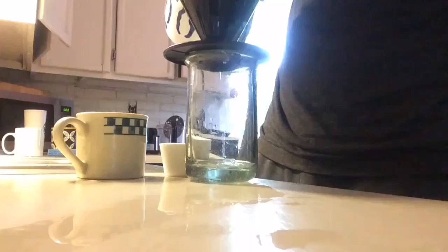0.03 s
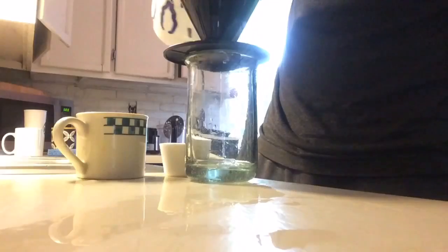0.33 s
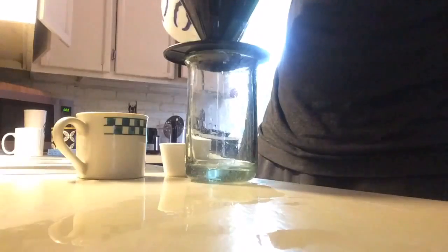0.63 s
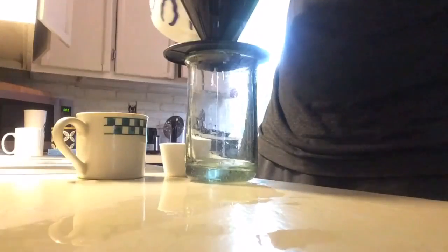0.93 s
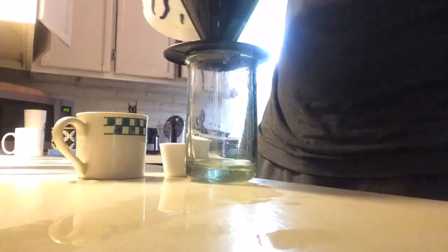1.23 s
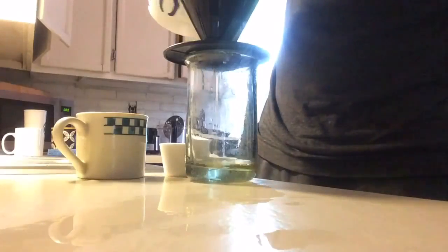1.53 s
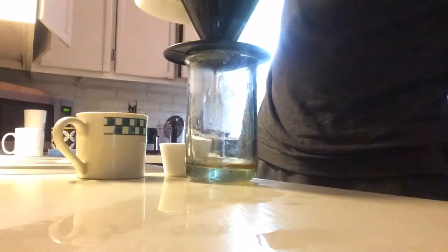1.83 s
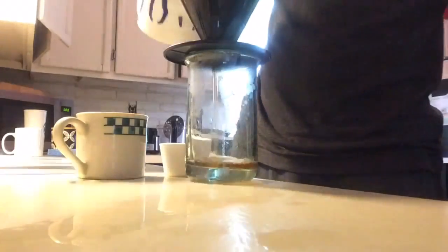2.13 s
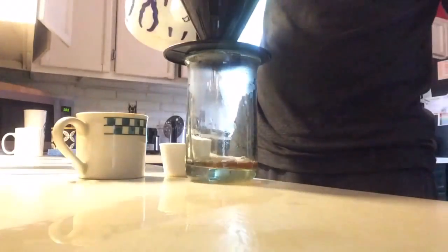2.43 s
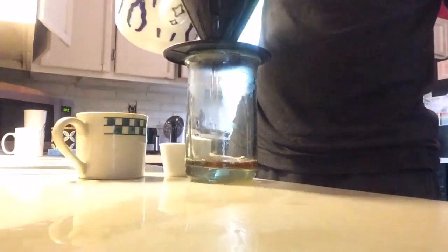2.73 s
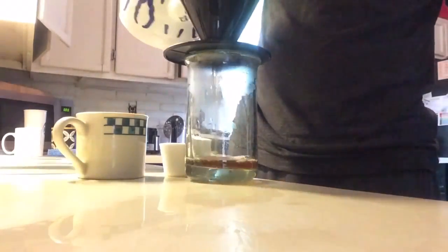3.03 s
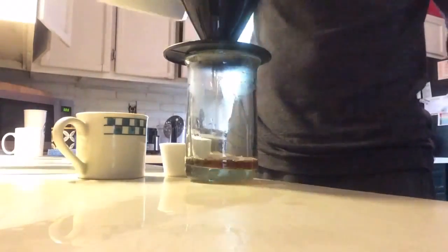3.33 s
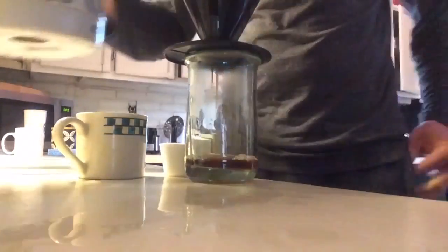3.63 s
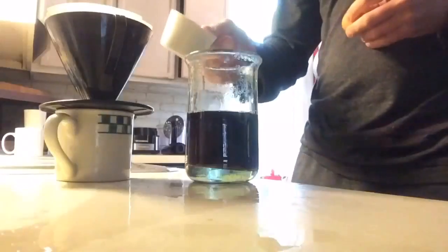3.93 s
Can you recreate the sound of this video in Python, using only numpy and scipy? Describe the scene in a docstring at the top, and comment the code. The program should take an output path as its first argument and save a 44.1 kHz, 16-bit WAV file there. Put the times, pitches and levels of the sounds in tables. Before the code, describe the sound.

A close, gentle pour of water bubbles and splats on wet coffee grounds, joined halfway by quick drops plinking into a glass jar. A dull kettle bump comes near the end, over a kitchen's steady fan and refrigerator hum.

```python
"""A refrigerator hums and a fan rushes in a small kitchen as water pours from a kettle into a coffee
dripper. Bubbles gurgle and burst in the dripper's cone, and the stream spatters on the wet grounds.
Then coffee drips into the glass jar below: each drop slaps the surface and rings the air in the glass,
and a few tiny bubbles chirp. Last, the kettle is lifted away with two soft bumps and a faint ring."""
import sys
import numpy as np
from scipy import signal
from scipy.fft import rfft, irfft, next_fast_len
from scipy.io import wavfile
from scipy.ndimage import map_coordinates

SR = 44100
rng = np.random.default_rng(int(sys.argv[2]) if len(sys.argv) > 2 else 0)


def transcribe(signal):
    """Save signal, clipped to [-1, 1], as a 16-bit WAV file at the path in sys.argv[1]."""
    frames = np.atleast_2d(signal).T
    limited = np.clip(frames, -1, 1)
    pcm = np.round(limited * 32767).astype(np.int16)
    wavfile.write(sys.argv[1], SR, pcm)


N = 176400

# A t60 is the time a sound takes to fade by 60 dB. Relative levels get a further gain later.
HUM_TONES = [(117.8, -51), (119.8, -69.5), (203.6, -69.5), (212.8, -64.5), (239.6, -55.5), (407.4, -70),
             (459.4, -62.5), (471.0, -66), (706.4, -69), (814.6, -65)]  # motor and mains tones (f/Hz, rms level/dB)
FAN_COLOUR = [(25, -15), (60, -10.5), (100, -2), (150, 1), (240, -5.5), (310, 0), (440, -4), (530, -9.5),
              (650, -6.5), (950, -6), (1200, -6.5), (1600, -15), (2300, -17.5), (3000, -21), (4000, -29),
              (5000, -31), (7000, -35), (11000, -40.5), (15800, -37)]  # the fan's rush from bass to treble (f/Hz, relative level/dB)
FAN_RESONANCES = [(728, 60, -59), (803.3, 31, -59.5), (863.2, 34, -56), (1042, 9, -70)]  # pitches that stand out of the rush (f/Hz, width/Hz, rms level/dB)
WHINE_LEVELS = [(.1, -79.5), (1.7, -80.5), (2.4, -85)]  # a faint high whine (t/s, level/dB)
CONE_RESONANCES = [(1720, 300, -6), (2023, 190, 0), (2278, 62, 3), (2610, 270, -3.5)]  # air ringing in the dripper (f/Hz, width/Hz, relative level/dB)
GURGLE_LEVELS = [(.1, -67), (.3, -66), (.4, -60.5), (.65, -67), (.75, -56.5), (.85, -59.5), (.98, -54.5),
                 (1.08, -65), (1.2, -56.5), (1.45, -54.5), (1.72, -56), (1.76, -66), (2.85, -66),
                 (2.93, -62), (3.1, -58), (3.16, -62), (3.7, -64), (3.76, -63)]  # the stream churning the grounds (t/s, relative level/dB)
SPATTER_LEVELS = [(.1, -74), (.48, -74), (.61, -67.5), (.72, -70.5), (1.08, -71), (1.18, -68.5),
                  (1.28, -71.5), (1.45, -72), (1.64, -66), (1.77, -72.5), (2.36, -75), (2.85, -69),
                  (3.03, -68), (3.09, -63), (3.18, -71.5), (3.36, -71.5), (3.7, -68), (3.75, -89)]  # spatter on the wet grounds (t/s, relative level/dB)
FILTER_SPLATS = [(0.4918, -53), (0.5524, -51), (0.612, -49), (0.9227, -50.5), (1.141, -51), (1.1737, -53),
                 (1.184, -48), (1.362, -49), (1.456, -51), (1.492, -44), (1.515, -48), (1.613, -48),
                 (1.6265, -49), (1.634, -47), (1.645, -45), (1.6888, -48), (2.0562, -54), (2.498, -48),
                 (3.07, -47), (3.093, -43), (3.102, -41.5)]  # single splats on the filter (t/s, relative level/dB)
SPLAT_SPECTRUM = [(1000, -12), (2500, 5.5), (5000, 1), (15800, -5.5)]  # tone colour of a splat (f/Hz, relative level/dB)
BURSTING_BUBBLES = [(0.5172, -38.5, 1850), (0.5287, -43, 2410), (0.734, -41.5, 2130), (0.756, -43, 1980),
                    (0.9582, -38, 2040), (0.9901, -35.5, 1880), (1.6327, -38.5, 2030), (1.72, -36, 2030),
                    (2.2148, -31.5, 2440), (2.747, -45, 2640), (2.9103, -42, 2300), (2.9303, -35, 1880),
                    (2.932, -41.5, 2570), (3.0154, -38.5, 2480), (3.031, -42, 2500), (3.698, -43, 2210)]  # larger bubbles (t/s, relative level/dB, f/Hz)
SPRAY_BURSTS = [(0.548, 0.564, -65), (1.55, 1.695, -72), (3.066, 3.108, -65), (3.393, 3.72, -67)]  # moments when the stream breaks up (start t/s, end t/s, level/dB)
SPRAY_SPECTRUM = [(2000, -35), (5000, -26), (8000, 1), (11500, -7), (14300, 4), (15800, -1)]  # tone colour of that hiss (f/Hz, relative level/dB)
# drops landing in the jar (t/s, then relative level/dB in the low, middle, high and top pitch band)
JAR_DROPS = [(1.827, -83, -56.5, -71, -78), (1.857, -83, -78, -63, -74), (1.927, -82, -82, -66.5, -80),
             (2.028, -85, -67, -84, -90), (2.093, -63.5, -62, -87, -85), (2.105, -76, -57.5, -58.5, -81),
             (2.185, -85, -72, -68.5, -82), (2.316, -62.5, -67, -77, -81), (2.396, -81, -69, -78, -86),
             (2.4128, -82, -65, -71, -62), (2.4279, -62.5, -51, -71, -73), (2.44, -83, -72, -68, -76),
             (2.528, -66, -77, -87, -90), (2.547, -73, -50.5, -66, -78), (2.601, -85, -67, -75, -81),
             (2.62, -77, -52.5, -68, -72), (2.648, -65, -58, -69, -86), (2.6677, -77, -64, -59, -73),
             (2.681, -85, -76, -66, -86), (2.747, -74, -87, -89, -79), (2.8657, -70, -55.5, -67, -77),
             (2.879, -83, -57, -82, -85), (2.898, -55, -58, -62, -75), (2.916, -68, -59, -55, -76),
             (2.946, -77, -56.5, -62, -73), (2.955, -80, -61, -71, -85), (2.977, -83, -61, -70, -84),
             (2.991, -79, -55, -57.5, -61), (3.021, -58.5, -65, -81, -84), (3.062, -77, -62, -66, -69),
             (3.075, -63, -63, -66, -69), (3.1, -57, -67, -71, -75), (3.126, -51, -71, -59.5, -78),
             (3.159, -57, -63, -69, -86), (3.2263, -59.5, -49, -60.5, -76), (3.257, -77, -63, -70, -71),
             (3.319, -72, -61.5, -71, -78), (3.385, -69, -65, -74, -76), (3.4116, -46, -62, -74, -77),
             (3.429, -78, -63, -71, -82), (3.4943, -66, -53.5, -64.5, -73), (3.537, -73, -61.5, -76, -82),
             (3.58, -44.5, -65, -64, -71), (3.585, -62, -61.5, -68, -77), (3.631, -59, -79, -80, -82),
             (3.647, -76, -65, -82, -86), (3.659, -65, -66, -81, -85), (3.6777, -71, -60, -61, -66),
             (3.71, -79, -65, -74, -80), (3.718, -59.5, -72, -77, -78)]
JAR_RINGS = [(3388, -0.5, 0.017), (3515, -3, 0.019), (5895, -6.5, 0.037), (6210, -5.5, 0.025),
             (6620, -12, 0.012), (6880, -9.5, 0.023), (8420, 2, 0.026), (9100, 3.5, 0.04),
             (9820, -3, 0.033), (10200, 2, 0.022), (10810, 3.5, 0.027), (12400, 2, 0.015), (13500, 5, .018),
             (14500, 0, .02)]  # the jar's ringing tones (f/Hz, relative level/dB, t60/s)
BAND_BORDERS = [4500, 7700, 11800]  # where the four bands meet (f/Hz)
BAND_GAINS = [0.79, 1.3, 0.56, 0.3]  # weight of each band (gain/dB)
SPLASH_RANGES = [(3000, 4000), (5600, 7100), (8000, 11300), (11900, 15800)]  # splash noise in each band (low f/Hz, high f/Hz)
SPLASH_LEVELS = [-15, -10, -5, 0]  # splash against the rings in each band (level/dB)
CHIRPING_BUBBLES = [(2.574, -50, 8100), (2.638, -49, 8800), (2.81, -52, 8150), (2.843, -50, 8850),
                    (2.894, -43, 9100), (3.124, -45, 8300), (3.126, -37.5, 3460), (3.6768, -36.5, 9900)]  # tiny bubbles in the jar (t/s, level/dB, starting f/Hz)
KETTLE_BUMPS = [(3.562, 645, -39.5), (3.566, 440, -46)]  # bumps as the kettle is lifted (t/s, f/Hz, level/dB)
ROOM_DECAY = [(300, 0.15), (3000, 0.2), (8000, 0.11), (15000, 0.11)]  # how long the kitchen echoes (f/Hz, t60/s)


def amp(db):
    """Turn decibels into a gain."""
    return 10 ** (np.asarray(db) / 20)


def unit(x):
    """Scale to an average strength (rms) of 1."""
    return x / np.sqrt(np.mean(x ** 2) + 1e-20)


def along(points, hz):
    """Read between (f/Hz, value) points on a log frequency axis."""
    f, v = np.transpose(points)
    return np.interp(np.log(hz + 1), np.log(f + 1), v)


def curve(rows):
    """Join (t/s, value) rows into one value per sample."""
    return np.interp(np.arange(N) / SR, *np.transpose(rows))


def wobble(rate):
    """A smooth curve through `rate` random points a second."""
    return map_coordinates(rng.standard_normal(int(N * rate / SR) + 4), [np.arange(N) * rate / SR])


def filtered(x, response):
    """Scale each frequency f in x by response(f)."""
    m = next_fast_len(len(x) + 8192)
    return irfft(rfft(x, m) * response(np.fft.rfftfreq(m, 1 / SR)), m)[:len(x)]


def noise(response, size=N):
    """Filtered noise of rms 1."""
    return unit(filtered(rng.standard_normal(size), response))


def fade(t, t60):
    """Die away by 60 dB every t60 seconds."""
    return np.exp(-np.log(1000) * t / t60)


def attack(t, rise_s):
    """Swell quickly from 0 towards 1."""
    return 1 - np.exp(-t / rise_s)


def add(out, s, sound):
    """Mix a sound in at s seconds."""
    i = max(round(s * SR), 0)
    out[i:i + len(sound)] += sound[:max(len(out) - i, 0)]


def refrigerator(waver_db=1, drift_rad=0.17):
    """The motor and the mains hum in slightly unsteady tones."""
    out, t = np.zeros(N), np.arange(N) / SR
    for hz, db in HUM_TONES:
        peak = np.sqrt(2) * amp(db + waver_db * wobble(5.13))
        out += peak * np.sin(2 * np.pi * (hz * t + rng.random()) + drift_rad * wobble(1.57))
    return out


def narrow_noise(hz, width):
    """Noise gathered around one pitch."""
    return noise(lambda f: 1 / (1 + ((f - hz) / width) ** 2))


def fan(rush_db=-52):
    """Moving air makes a broad rush, with a few resonances on top."""
    resonances = sum(amp(db) * narrow_noise(hz, width) for hz, width, db in FAN_RESONANCES)
    return resonances + amp(rush_db) * noise(lambda f: amp(along(FAN_COLOUR, f)))


def whine():
    """A faint high whine that grows quieter."""
    return amp(curve(WHINE_LEVELS)) * narrow_noise(hz=4830, width=67)


def bubbles(per_s, hz, spread, scatter_db, cycles=11, size=600):
    """A cloud of tiny bubbles, each ringing for a few cycles at its own pitch; rms 1."""
    count = int(per_s * N / SR)
    t = np.arange(size) / SR
    pitch = np.minimum(hz * np.exp(spread * rng.standard_normal((count, 1))), SR / 2)
    strength = amp(scatter_db * np.minimum(rng.exponential(size=(count, 1)), np.pi))
    rings = strength * np.sin(2 * np.pi * pitch * t) * fade(t, cycles / pitch)
    positions = rng.integers(0, N, (count, 1)) + np.arange(size)
    return unit(np.bincount(positions.ravel(), rings.ravel(), N)[:N])  # add up overlapping rings


def cone(f):
    """The air in the dripper boosts the pitches at which it rings."""
    return sum((-1) ** k * amp(db) * 1j * f * width / (hz ** 2 - f ** 2 + 1j * f * width)
               for k, (hz, width, db) in enumerate(CONE_RESONANCES))


def gurgle(gain_db=-5, flutter_db=1.6):
    """The stream churns up bubbles in the grounds, heard through the cone."""
    churn = unit(filtered(bubbles(per_s=700, hz=2210, spread=0.25, scatter_db=3.2), cone))
    return amp(curve(GURGLE_LEVELS) + gain_db + flutter_db * wobble(35)) * churn


def spatter(gain_db=1, flutter_db=1.3):
    """The stream hits the wet grounds in a fizz of very small bubbles."""
    loudness = amp(curve(SPATTER_LEVELS) + gain_db + flutter_db * wobble(90))
    return loudness * bubbles(per_s=3500, hz=8030, spread=0.53, scatter_db=3.4, size=96)


def splats(gain_db=-7.5, size=2000):
    """Water hits the filter in short, bright bursts of noise."""
    out, t = np.zeros(N), np.arange(size) / SR
    for s, db in FILTER_SPLATS:
        burst = noise(lambda f: amp(along(SPLAT_SPECTRUM, f)), size)
        add(out, s, amp(db + gain_db) * fade(t, t60=0.031) * burst)
    return out


def plops(gain_db=-7, ring_db=-4, puff_width_hz=710, t60=0.027, size=3000):
    """A larger bubble bursts: a short rising ring and a wet puff around its pitch."""
    out, t = np.zeros(N), np.arange(size) / SR
    for s, db, hz in BURSTING_BUBBLES:
        ring = amp(ring_db) * np.sin(2 * np.pi * hz * t * (1 + 0.44 * t / t60 / 2))  # up 44% by t60
        puff = noise(lambda f: 1 / (1 + ((f - hz) / puff_width_hz) ** 4), size)
        add(out, s, amp(db + gain_db) * (ring + puff) * fade(t, t60) * attack(t, 0.00044))
    return out


def spray(edge_s=0.008, flutter_db=1.1):
    """The stream hisses whenever it breaks up."""
    t = np.arange(N) / SR
    bursts = sum(amp(db) * np.clip(np.minimum(t - start, end - t) / edge_s + .5, 0, 1)
                 for start, end, db in SPRAY_BURSTS)
    return bursts * amp(flutter_db * wobble(120)) * noise(lambda f: amp(along(SPRAY_SPECTRUM, f)))


def drop(levels_db, scatter_db=3.5, detune=0.0025, size=4000):
    """One drop slaps the surface, splashes and rings the jar, with its own level in each band."""
    t = np.arange(size) / SR
    hz, db, t60 = np.transpose(JAR_RINGS)[:, :, None]
    level_dice, pitch_dice, phase = rng.standard_normal((3, len(JAR_RINGS), 1))
    pitch = hz * (1 + detune * pitch_dice)
    rings = amp(db + scatter_db * level_dice) * fade(t, t60) * np.sin(2 * np.pi * (pitch * t + phase))
    band = np.searchsorted(BAND_BORDERS, hz[:, 0])
    body = np.zeros(size)
    for k, (lo, hi) in enumerate(SPLASH_RANGES):
        hiss = noise(lambda f: 1 / (1 + ((2 * f - lo - hi) / (hi - lo)) ** 4), size)
        splash = amp(SPLASH_LEVELS[k]) * unit(hiss * fade(t, t60=0.0078))
        ring = unit(rings[band == k].sum(0))
        body += amp(levels_db[k] + BAND_GAINS[k]) * unit(ring + splash)
    # The slap is noise from about 2500 to 10800 Hz; it follows the loudest of the upper three bands.
    slap_noise = noise(lambda f: f ** 2 / (f ** 2 + 2500 ** 2) / (1 + (f / 10800) ** 4), size)
    slap = amp(max(levels_db[1:]) + 0.5) * fade(t, t60=0.0064) * slap_noise
    return slap + .5 * body * attack(t, 0.00052)


def dripping(rebound_db=-9.5):
    """Coffee drips into the jar; just after each drop, a smaller one falls back."""
    out = np.zeros(N)
    for s, *levels_db in JAR_DROPS:
        add(out, s, drop(levels_db))
        add(out, s + rng.uniform(0.003, 0.0081), amp(rebound_db) * drop(levels_db))
    return out


def droplets(start_s=2.4, end_s=3.7, per_s=20, levels_db=(-70, -72, -76, -89), scatter_db=3):
    """Small drops land at random between the main ones."""
    out = np.zeros(N)
    for s in rng.uniform(start_s, end_s, int(per_s * (end_s - start_s))):
        add(out, s, drop(levels_db + scatter_db * rng.standard_normal(len(levels_db))))
    return out


def chirps(rise_per_s=5.2, size=1500):
    """A trapped bubble rises in pitch as it nears the surface."""
    out, t = np.zeros(N), np.arange(size) / SR
    for s, db, hz in CHIRPING_BUBBLES:
        ring = np.sin(2 * np.pi * hz * t * (1 + rise_per_s * t / 2))
        add(out, s, amp(db) * ring * fade(t, t60=0.029) * attack(t, 0.0017))
    return out


def kettle_lift(ring_s=3.808, ring_hz=5400, ring_db=-68.5, size=12000):
    """The kettle is lifted away: dull bumps, then a faint ring."""
    out, t = np.zeros(N), np.arange(size) / SR
    for s, hz, db in KETTLE_BUMPS:
        add(out, s, amp(db) * np.sin(2 * np.pi * hz * t) * fade(t, t60=0.073) * attack(t, 0.0014))
    add(out, ring_s, amp(ring_db) * np.sin(2 * np.pi * ring_hz * t) * fade(t, t60=0.51))
    return out


def kitchen(x, delay_samples=130):
    """The small room's echo, which dies soonest in the treble."""
    hz, t, spectrum = signal.stft(rng.standard_normal(SR // 2), SR, nperseg=256)
    tail = signal.istft(spectrum * fade(t, along(ROOM_DECAY, hz)[:, None]), SR, nperseg=256)[1]
    return signal.fftconvolve(x, np.pad(tail / np.linalg.norm(tail), (delay_samples, 0)))[:N]


def scene(echo_db=-11):
    """The pour and the drips close by, their echo, and the appliances behind them."""
    background = refrigerator() + fan() + whine()
    near = kettle_lift() + plops() + splats() + dripping() + droplets() + chirps()
    near += gurgle() + spatter() + spray()
    return (near + amp(echo_db) * kitchen(near) + background)[None]


def record(dry, start_s=0.084, top_hz=15850):
    """The sound starts after a moment of silence and has no treble above top_hz."""
    fade_in = np.clip((np.arange(N) / SR - start_s) / .002, 0, 1)
    return filtered(dry[0] * fade_in, lambda hz: hz < top_hz)[None]


dry = scene()
out = record(dry)
transcribe(out)
```